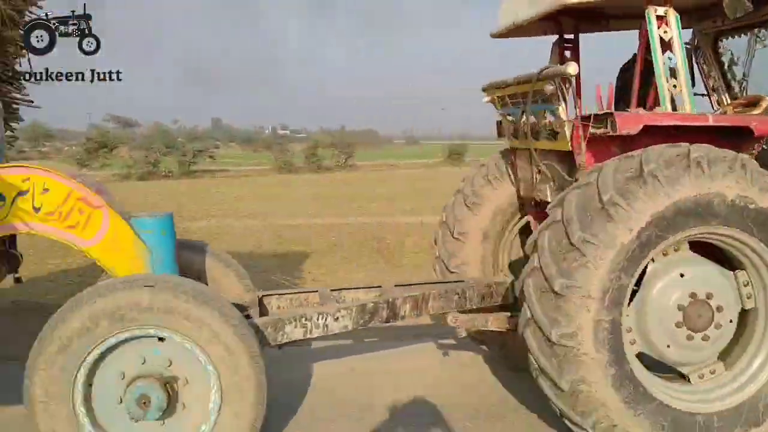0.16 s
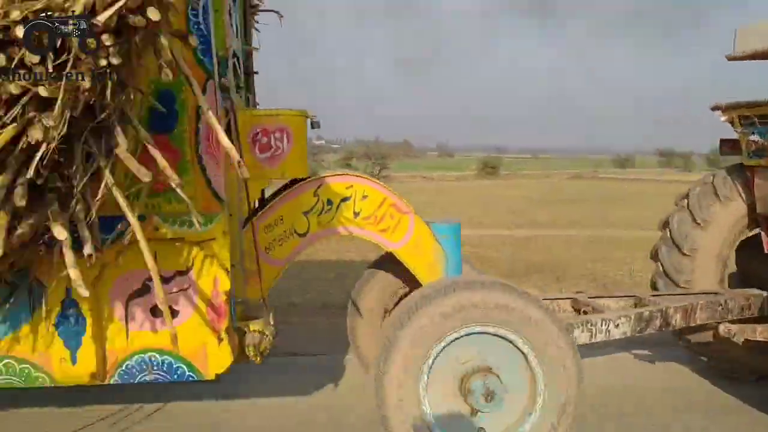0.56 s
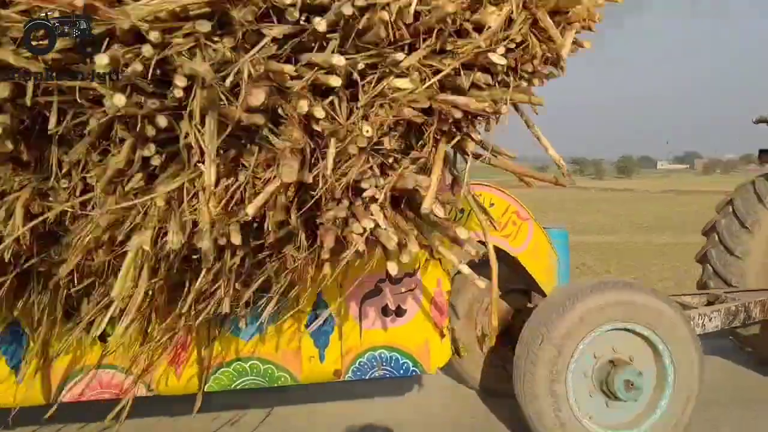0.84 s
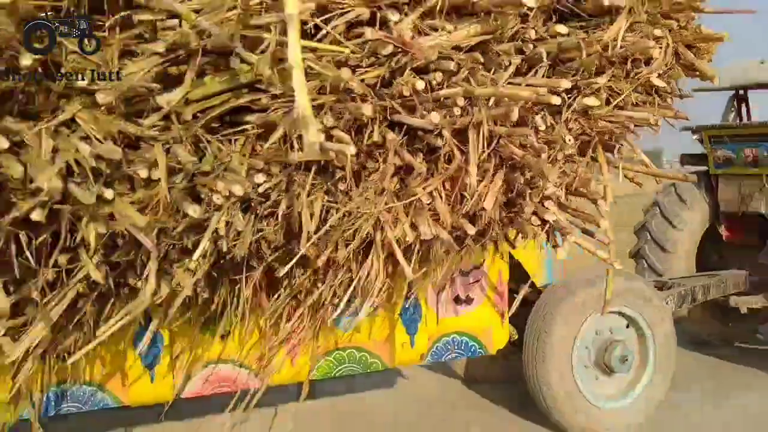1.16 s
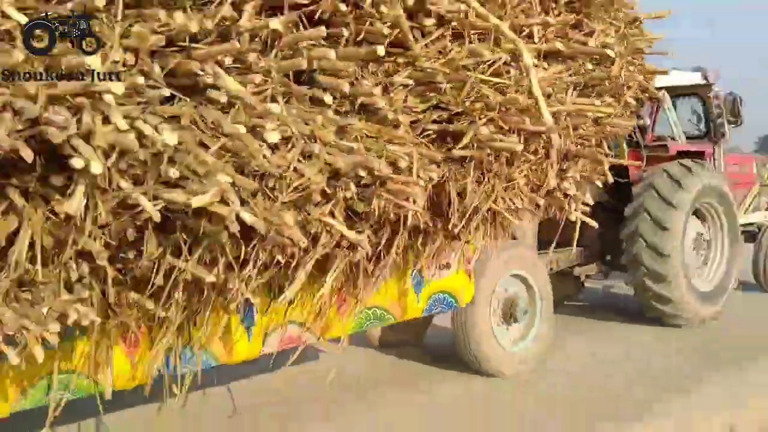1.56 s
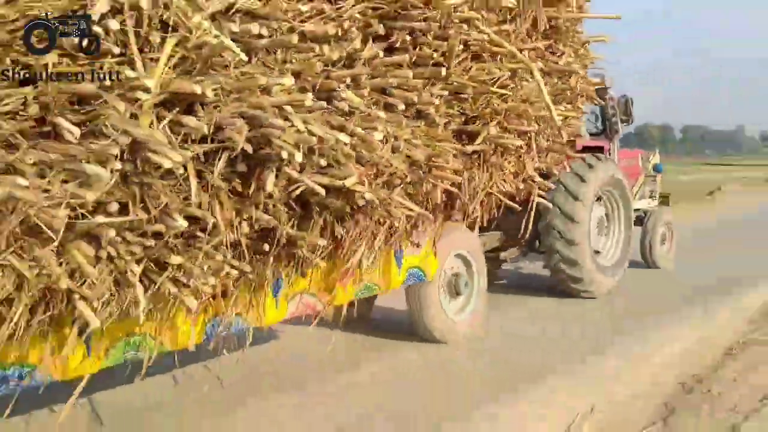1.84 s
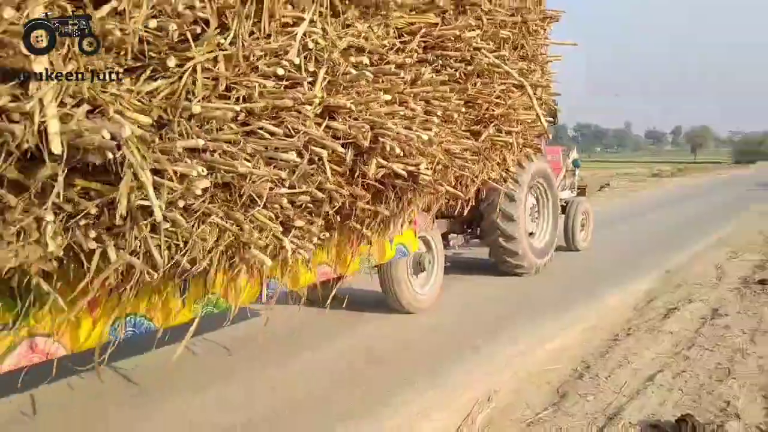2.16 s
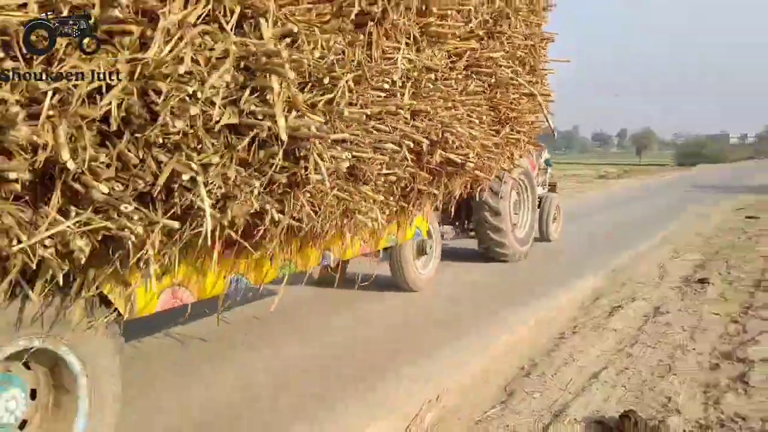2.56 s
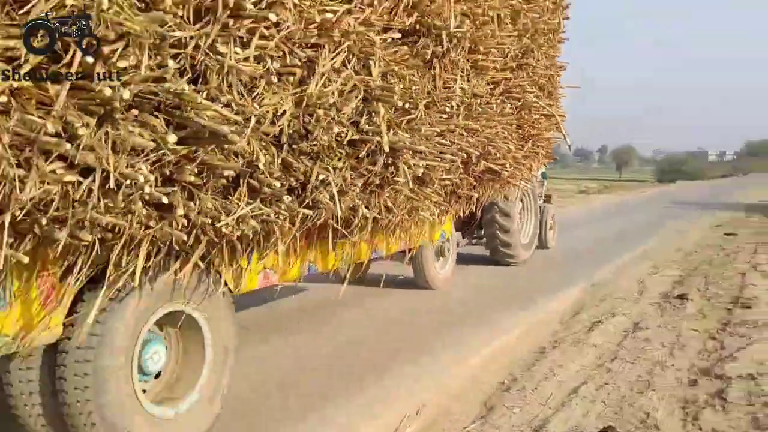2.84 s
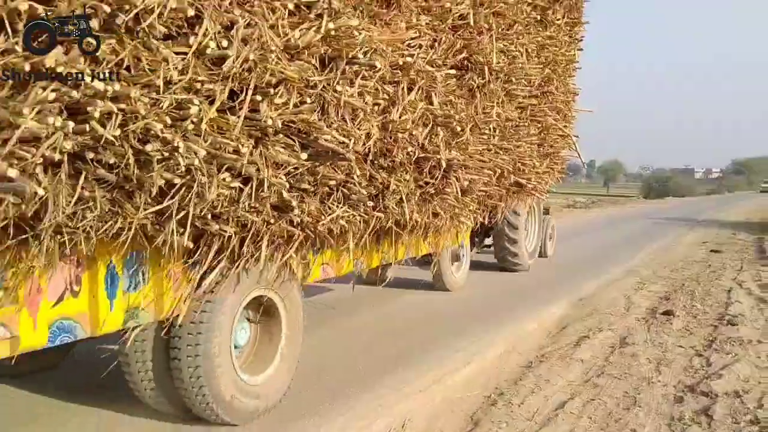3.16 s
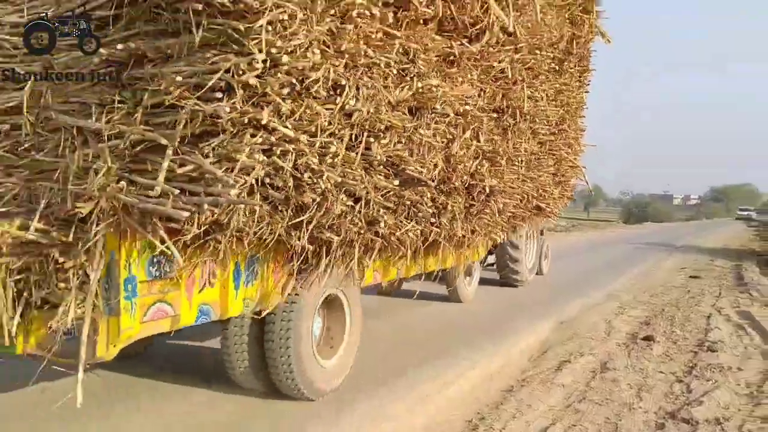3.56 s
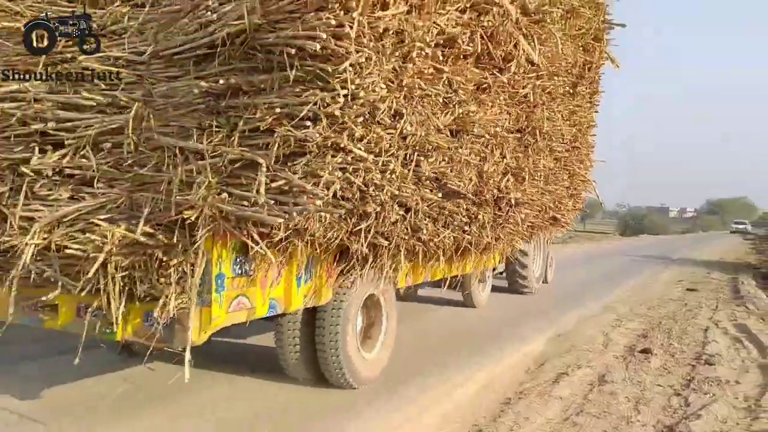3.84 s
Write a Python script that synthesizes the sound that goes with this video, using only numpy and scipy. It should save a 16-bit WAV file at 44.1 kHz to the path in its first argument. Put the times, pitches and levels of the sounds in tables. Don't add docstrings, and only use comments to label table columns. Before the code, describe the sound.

A loud, rough tractor diesel with whining gears passes close on an open rural road; after a second its hum drops, the trailer bangs and rattles, the roar fades, and the wooden load creaks at the end.

```python
import sys
import numpy as np
from scipy import signal
from scipy.fft import rfft, irfft
from scipy.io import wavfile
from scipy.ndimage import uniform_filter1d

SR = 44100
rng = np.random.default_rng(int(sys.argv[2]) if len(sys.argv) > 2 else 0)


def generate_wav(sig):
    pcm = np.round(np.clip(np.atleast_2d(sig).T, -1, 1) * 32767).astype(np.int16)
    wavfile.write(sys.argv[1], SR, pcm)


def invert_db(level):
    return 10 ** (np.asarray(level, dtype=float) / 20)


N = 176400
T = np.arange(N) / SR

# time in seconds, mesh frequency in Hz,
# levels of the mesh, its 2nd and its 3rd harmonic in dB.
GEAR = [(0, 527.3, -31, -25.5, -46), (.13, 530, -25, -18, -26), (.24, 531.9, -28, -36, -16),
        (.42, 527, -33.5, -23, -25), (.52, 521.2, -29.5, -23.5, -21.5), (.68, 530.5, -32.5, -31, -21.5),
        (.8, 538.3, -25.5, -30, -18.5), (.9, 533.7, -24.5, -26, -20.5), (1.16, 528.3, -30.5, -28.5, -24)]
# time in seconds, roar level in dB, distance share from 0 to 1.
PASS = [(0, -11.5, 0.04), (.3, -12.5, 0.08), (.62, -13, 0.06), (.7, -14, 0.25), (1.1, -15.5, 0.25),
        (1.4, -18.5, 0.44), (1.75, -17.5, 0.37), (1.9, -22.5, 0.56), (2.3, -28.5, 0.69), (2.7, -31, 0.64),
        (3.1, -35, 0.76), (3.5, -37, 0.7), (3.8, -27.5, 0.74), (4, -32.5, 0.54)]
MESH_PER_FIRING = 6.5
LIFT_S = 1.14


def evened(x):
    return x / np.sqrt(np.mean(x ** 2) + 1e-20)


def curve(table, order=1):
    rows = np.array(table, float)
    return np.interp(T, rows[:, 0], rows[:, order])


def colour(x, points):
    hz = np.fft.rfftfreq(len(x), 1 / SR) + 1
    f, level = np.transpose(points)
    db = np.interp(np.log(hz), np.log(f), level)
    db = db - np.clip(40 * np.log2(f[0] / hz), 0, 16)
    return evened(irfft(rfft(x) * invert_db(db), len(x)))


def drift(hz):
    b, a = signal.butter(2, hz / (SR / 2))
    wander = signal.lfilter(b, a, rng.standard_normal(N + SR))
    return evened(wander[SR:])


def resonate(x, hz, width):
    turn = np.exp(2j * np.pi * np.cumsum(hz * np.ones(len(x))) / SR)
    r = np.exp(-np.pi * width / SR)
    smooth = signal.lfilter([(1 - r) ** 2], [1, -2 * r, r * r], x / turn + 1e-18)
    return 2 * (turn * smooth).real


def distance():
    return np.clip(curve(PASS, order=2), 0, 1)


def throttle_gain():
    lift_len_s, lifted_db = .08, -22
    step = np.clip((T - LIFT_S) / lift_len_s, 0, 1)
    return invert_db(step * (lifted_db + curve(PASS) + 25.5))


def firing_noise():
    gate_share, gate_decay = 0.12, 0.17
    cylinder_db = [-30.5, -23, -20, -8.5]
    turns = np.cumsum(curve(GEAR) / MESH_PER_FIRING * (1 + .12 * drift(60))) / SR
    count = turns.astype(int)
    uneven_db = 0.83 * rng.standard_normal(count[-1] + 1)[count]
    size = invert_db(np.take(cylinder_db, count % 4) + uneven_db)
    puffs = evened(size * np.exp(-(turns % 1) / gate_decay))
    gate = 1 - gate_share + gate_share * puffs
    ticks = invert_db(2.5 * np.minimum(rng.exponential(1, N), 2)) * (rng.random(N) < 300 / SR)
    ticks = signal.lfilter([1], [1, -np.exp(-1 / (0.0012 * SR))], ticks) * rng.standard_normal(N)
    noise = rng.standard_normal(N) * gate + 0.28 * evened(ticks)
    return noise * invert_db(0.6 * drift(18) + 0.3 * drift(6.6))


def roar():
    # frequency in Hz, density in dB per Hz.
    near_spectrum = [(75, -59), (130, -16), (240, -2), (420, -12), (750, -1.5), (1250, -5.5), (2300, 1.5),
                     (3200, -13),
                     (4400, -19), (6000, -23), (7200, -23), (8400, -17), (9300, -25.5), (11000, -30),
                 (15500, -31)]
    far_low = [(44, -60), (85, -12.5), (130, -6), (175, -5.5), (222, -10), (361, -10.5), (403, -18),
               (596, -13), (829, -12.5), (3200, -30), (4160, -55), (7040, -120)]
    far_high = [(4200, -30), (5200, -37.5), (7000, -50), (8400, -52), (9500, -44), (11000, -53),
                (15500, -65)]
    # frequency in Hz, width in Hz, level in dB.
    panels = [(682, 140, -27.5), (1564, 550, -17), (2135, 200, -18.5), (2480, 690, -20.5), (3935, 150, -38),
              (4440, 390, -32.5)]
    panel_far_db = -4.5
    drive = firing_noise()
    far = distance()
    ring = 0
    for hz, width, db in panels:
        ring = ring + invert_db(db + 1.2 * drift(5)) * evened(resonate(drive, hz, width))
    near_sound = (1 - far) * colour(drive, near_spectrum)
    far_sound = far * colour(drive, far_low[:-2] + far_high)
    return invert_db(curve(PASS)) * (ring * invert_db(panel_far_db * far) + near_sound + far_sound)


def gear_whine():
    # multiple of the mesh, level in dB, aimed moment in s, span in s.
    beams = [(4, -36, 0.31, 0.13), (4, -29, 1.13, .12), (4.375, -22, .4, .17), (4.375, -29, 0.79, 0.17),
             (4.95, -25, .55, .1), (4.93, -27, 0.97, .25), (7.42, -37.5, 0.81, 0.1), (7.4, -43, 1.05, .08)]
    mesh = 2 * np.pi * np.cumsum(curve(GEAR)) / SR
    out = np.zeros(N)
    for k in range(1, 4):
        out += invert_db(curve(GEAR, order=k + 1) + 0.5 * drift(17)) * np.sin(k * mesh)
    for k, db, s, span in beams:
        beam_db = db + 2.5 * drift(12) - 6 * ((T - s) / span) ** 2
        out += invert_db(beam_db) * np.sin(k * mesh + .35 * drift(14))
    return np.sqrt(2) * out * throttle_gain()


def firing_orders():
    # multiple of the firing rate, level in dB, rise in dB per second.
    orders = [(1, -35.5, 4), (1.5, -38, 0.5), (2, -34, 2.5), (2.75, -36, -1), (3, -29.5, -1.5),
              (4.45, -35, 2), (8.95, -39, -2)]
    steady_hz = uniform_filter1d(curve(GEAR), size=12000)
    crank = 2 * np.pi * np.cumsum(steady_hz) / SR / MESH_PER_FIRING
    out = np.zeros(N)
    for k, db, rise_db in orders:
        level = invert_db(db + rise_db * np.minimum(T, LIFT_S) + .35 * k * drift(5))
        out += level * np.sin(k * crank + .03 * k * drift(8))
    return np.sqrt(2) * out * throttle_gain()


def driveline_hum():
    # time in seconds, frequency in Hz, level in dB.
    slowing = [(1.14, 718, -40), (1.19, 706, -24.5), (1.36, 663, -27), (1.52, 626, -29), (1.58, 612, -38)]
    # multiple, level in dB, fade in dB per second.
    multiples = [(.169, -6, -7), (.225, -9, -22), (.337, -7, -4), (.43, -3.5, -11), (.5, -3.5, -27),
                 (.73, -6, -43), (1, 0.5, 1)]
    start, end = slowing[0][0], slowing[-1][0]
    phase = 2 * np.pi * np.cumsum(curve(slowing)) / SR
    out = np.zeros(N)
    for k, db, fade_db in multiples:
        out += invert_db(db + fade_db * np.clip(T - start, 0, 1)) * np.sin(k * phase)
    return np.sqrt(2) * invert_db(curve(slowing, order=2)) * ((T > start) & (T < end)) * out


def thump():
    thump_hz, width_hz, near_db, far_db = 150, 70, -26, -15
    idle_share = .76
    speed = np.interp(T, [LIFT_S, 1.7], [1, idle_share]) * (1 + .05 * drift(10))
    turns = np.cumsum(curve(GEAR) / MESH_PER_FIRING / 4 * speed) / SR
    puff = np.exp(-(turns % 1) / .2) * drift(300) * invert_db(2.5 * drift(9))
    level = invert_db(curve(PASS) + near_db + distance() * (far_db - near_db))
    return level * evened(resonate(puff, thump_hz, width_hz))


def jolts():
    # start in seconds, level in dB, decay in seconds, brightness in dB.
    bursts = [(1.284, -16, 0.08, -4.5), (1.447, -19, 0.029, -9), (1.456, -15.5, 0.032, 6.5),
              (1.475, -19.5, 0.032, 1), (1.495, -22, 0.036, 3), (1.552, -16, .04, -8),
              (1.564, -19.5, 0.031, 4), (1.59, -20, .03, 6.5), (1.612, -24.5, 0.053, 9.5),
              (1.665, -26, 0.024, 9), (1.705, -25, 0.014, 6), (1.717, -27, .015, 12.5),
              (1.76, -30, .008, 12), (1.743, -26, .012, 11), (1.898, -36, .02, -8),
              (2.019, -21.5, 0.02, -21), (2.109, -30, 0.032, -13), (2.237, -32, 0.06, -17),
              (2.416, -36, 0.045, -22), (2.49, -28.5, 0.05, -24), (3.178, -47, 0.016, 8),
              (3.235, -42, 0.013, 10), (3.306, -42, 0.039, 0)]
    # frequency in Hz, density in dB per Hz.
    crash = [(80, -45), (130, -25), (230, -12), (1500, -2.5), (2750, -5), (3400, -16), (6500, -24),
             (8500, -24), (15500, -44)]
    # start in seconds, frequency in Hz, level in dB, ring in seconds.
    clinks = [(1.3, 1550, -24.5, 0.016), (1.453, 2420, -15, 0.012), (1.3, 2695, -26.5, 0.023),
              (1.46, 4700, -32, 0.015), (1.565, 570, -22.5, 0.0094), (1.575, 700, -25, 0.011),
              (1.455, 880, -22.5, 0.019), (1.285, 890, -23, 0.019), (1.705, 1100, -22, 0.015),
              (1.46, 10200, -50, 0.028), (1.572, 10100, -36, 0.013), (1.592, 2070, -19, 0.011),
              (1.667, 10050, -31.5, 0.0076), (1.669, 3360, -29.5, .008), (1.62, 12100, -44, .006),
              (1.67, 13900, -42, .007), (1.75, 4800, -33, .005), (1.668, 6300, -38, 0.0083),
              (1.748, 8100, -39, 0.0069), (2.459, 950, -31, 0.018), (2.3, 990, -34, 0.017),
              (2.47, 710, -36, 0.021), (2.61, 3800, -50, 0.024), (3.768, 900, -32, .016),
              (1.722, 140, -26, .008), (3.4, 170, -41, 0.014), (1.562, 232, -21, 0.017)]
    noise = rng.standard_normal(N) * invert_db(1.8 * drift(150))
    body = colour(noise, crash)
    low = signal.sosfiltfilt(signal.butter(2, 3300 / (SR / 2), output="sos"), body)
    out, waver = np.zeros(N), drift(60)
    for s, db, decay, bright_db in bursts:
        u = np.clip(T - s, 0, 1)
        envelope = np.minimum(u / .003, 1) * np.exp(-u / decay)
        out += invert_db(db) * envelope * (low + invert_db(bright_db) * (body - low))
    for s, hz, db, ring in clinks:
        u = np.clip(T - s, 0, 1) / ring
        envelope = np.e * u * np.exp(-u) * (u < 12)
        phase = 2 * np.pi * hz * T + (.5 + hz / 9000) * waver
        out += invert_db(db) * envelope * np.sqrt(2) * np.sin(phase)
    return out


def creak():
    # frequency in Hz, width in Hz, level in dB.
    wood_modes = [(1466, 147, -7.5), (2024, 450, 2), (2523, 460, 4), (2970, 210, -1), (3440, 220, -3),
                  (3840, 220, -7.5), (6200, 2300, -17.5), (7600, 4200, -19), (11300, 10800, -21.5)]
    # time in seconds, peak in dB, loudest ring in Hz.
    slips = [(3.5508, -18.5, 2656), (3.5738, -16.5, 3460), (3.595, -18, 2800), (3.6157, -17, 2150),
             (3.6353, -16, 2560), (3.656, -15.5, 1880), (3.675, -16.5, 2350), (3.692, -14, 2570),
             (3.71, -14.5, 2540), (3.73, -17, 1960), (3.7457, -15, 2110), (3.7617, -10.5, 1970),
             (3.779, -12, 2130), (3.7958, -13, 2510), (3.8095, -13, 2160), (3.827, -13, 2060),
             (3.8401, -13.5, 2680), (3.858, -14, 2340), (3.8716, -13, 1920), (3.8857, -12, 1900),
             (3.9024, -14, 2400), (3.9155, -16.5, 2310), (3.9281, -16, 1900), (3.9434, -19, 3940),
             (3.9574, -21, 1850)]
    rise_s, tail_s, tail_db, rasp_db_per_s = .0008, .015, -13.5, 14
    loudest_db, loudest_width_hz, creak_db = 2.5, 320, 2
    stiff_hz, stiffen_per_s = 3300, .36
    spread = .025
    t, out = np.arange(3000) / SR, np.zeros(N + 3000)
    snap = (t / rise_s / 2) ** 2 * np.exp(2 - t / rise_s)
    rasp = invert_db(tail_db) * np.minimum(t / 0.0044, 1) * np.exp(-t / tail_s)
    for s, db, loudest_hz in slips:
        u = s - slips[0][0]
        draws = rng.standard_normal((len(wood_modes), 2))
        drive = (snap + invert_db(rasp_db_per_s * u) * rasp) * rng.standard_normal(len(t))
        wood = invert_db(loudest_db) * evened(resonate(drive, loudest_hz, loudest_width_hz))
        for (hz, width, mode_db), (a, b) in zip(wood_modes, draws):
            mode_hz = hz * (1 + stiffen_per_s * u * (hz > stiff_hz) + b * spread)
            wood += invert_db(mode_db + 1.4 * a) * evened(resonate(drive, mode_hz, width))
        out[round(s * SR):][:len(t)] += invert_db(db + creak_db) * wood / abs(wood).max()
    return out[:N]


def low_thuds():
    # time in seconds, peak in dB, frequency in Hz.
    thuds = [(1.558, -16, 240), (1.798, -20, 132), (1.862, -21, 127), (1.93, -24, 121), (1.996, -27, 118),
             (2.132, -23.5, 196), (2.286, -30, 113.5), (2.411, -25, 191.3), (2.518, -27, 229),
             (2.696, -28, 129), (2.762, -28, 194), (3.006, -30, 175), (3.091, -30.5, 161),
             (3.45, -37, 161.2), (3.543, -32, 170), (3.595, -29, 213), (3.739, -30, 124),
             (3.793, -27, 183)]
    ring_s, thud_db = .007, -2
    out = np.zeros(N)
    for s, db, hz in thuds:
        u = np.clip(T - s, 0, 1) / ring_s
        out += invert_db(db + thud_db) * np.e * u * np.exp(-u) * np.sin(2 * np.pi * hz * (T - s))
    return out


def faint_hum():
    hum = evened(resonate(rng.standard_normal(N), 367.9, 10))
    return invert_db(curve(PASS) - 17) * (1 - throttle_gain()) * hum


def rumble():
    return invert_db(-49) * evened(resonate(rng.standard_normal(N), 80, 36))


def scene():
    tractor = roar() + gear_whine() + firing_orders() + driveline_hum() + thump()
    trailer = jolts() + creak() + low_thuds() + faint_hum()
    return (tractor + trailer + rumble())[None]


def top_cut(x):
    return signal.sosfilt(signal.butter(12, 15680, fs=SR, output="sos"), x)


def record(dry):
    cut = signal.sosfilt(signal.butter(2, 45 / (SR / 2), "high", output="sos"), dry)
    mix = 1.207 * np.tanh(cut / 1.74)
    return top_cut(mix)


dry = scene()
out = record(dry)
generate_wav(out)
```